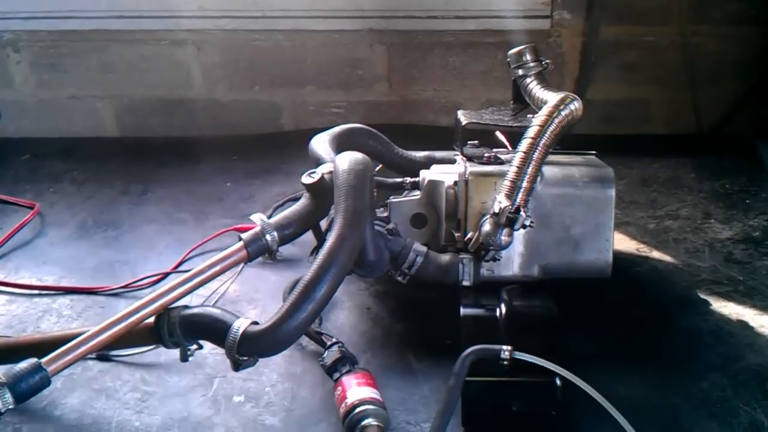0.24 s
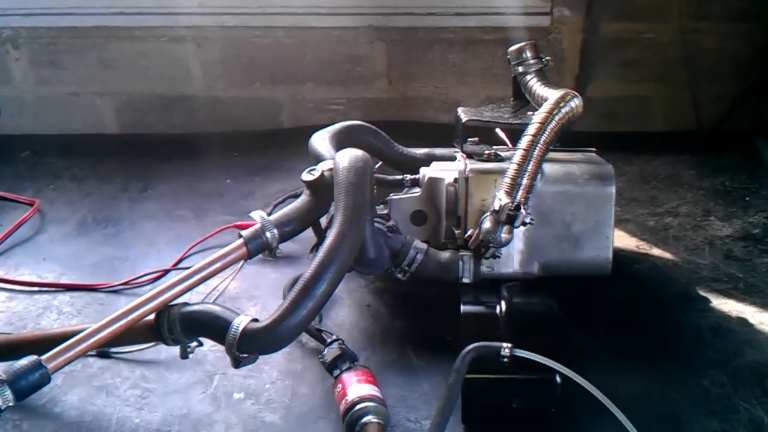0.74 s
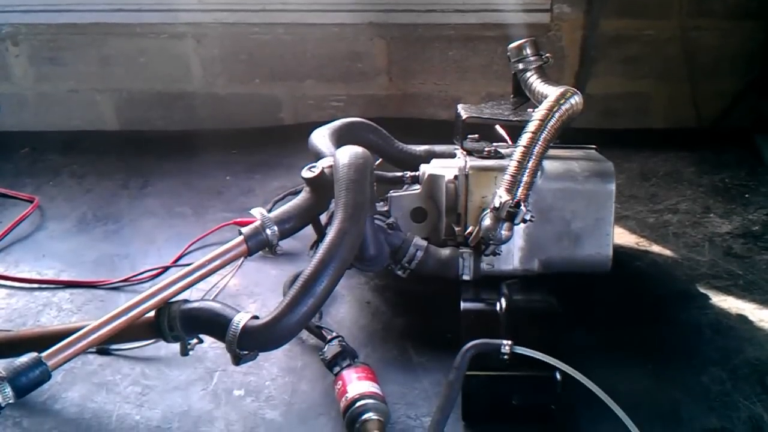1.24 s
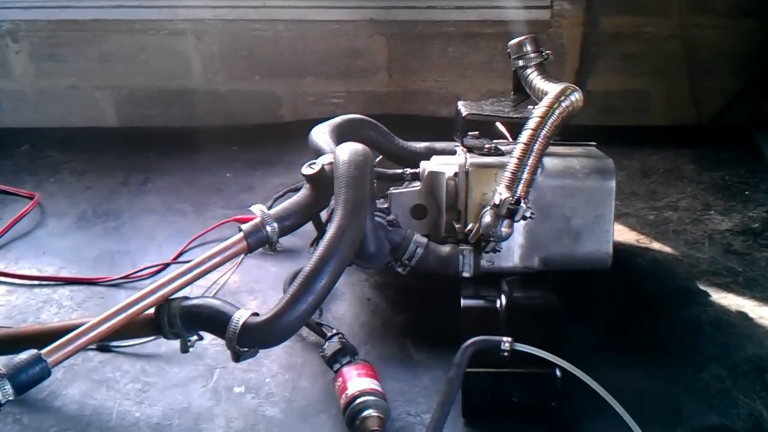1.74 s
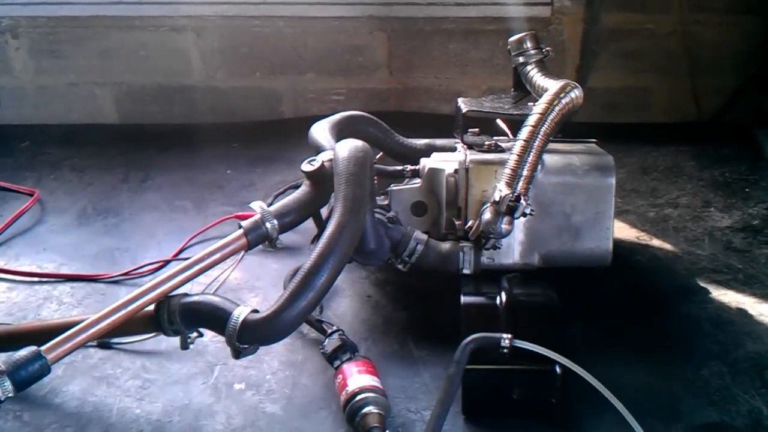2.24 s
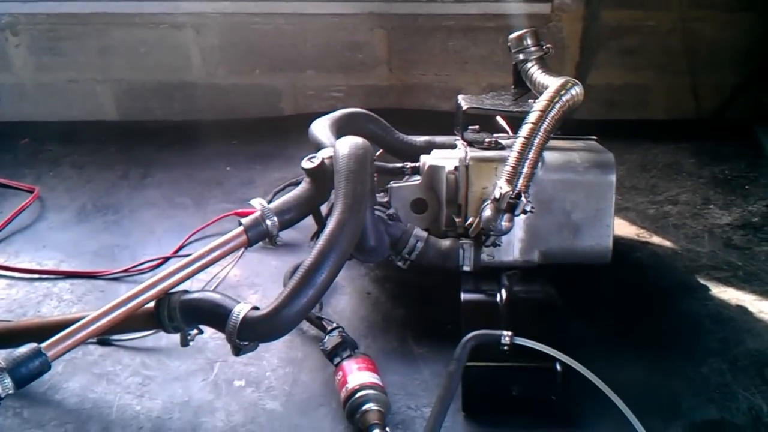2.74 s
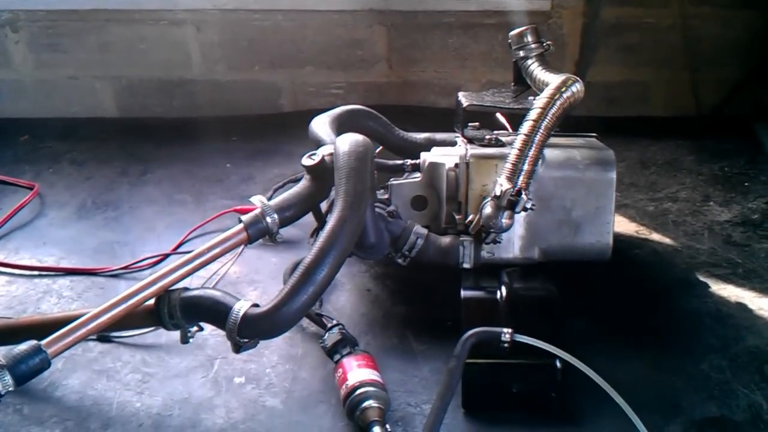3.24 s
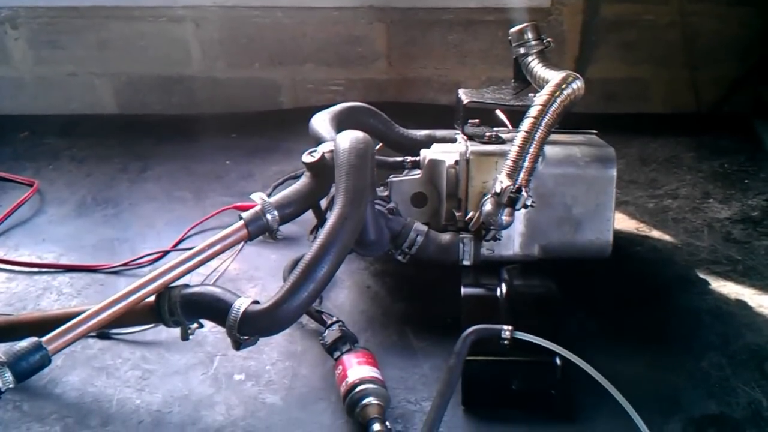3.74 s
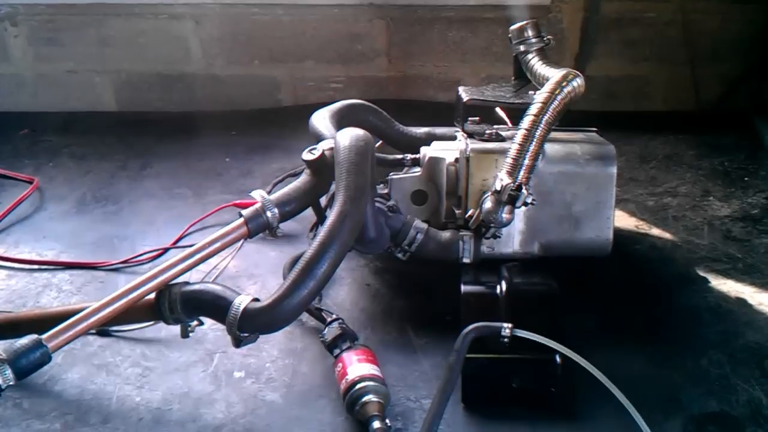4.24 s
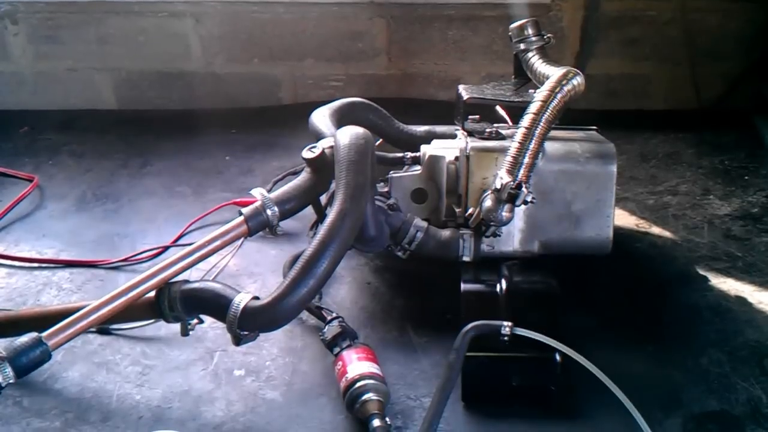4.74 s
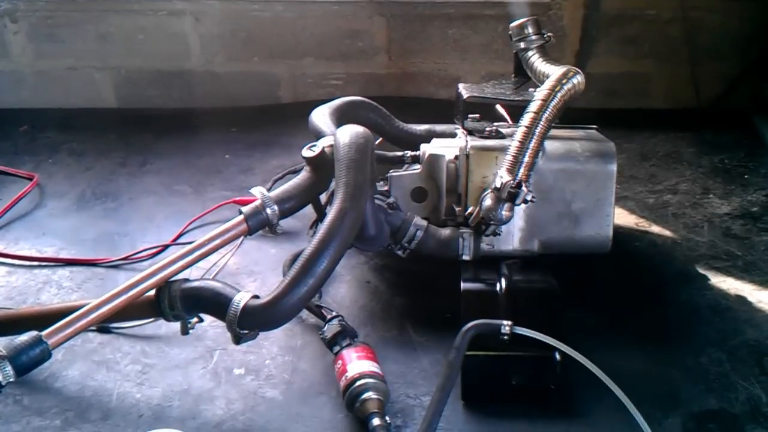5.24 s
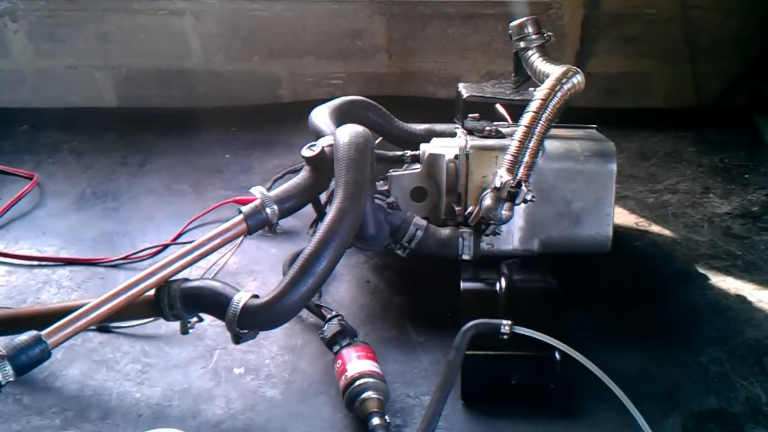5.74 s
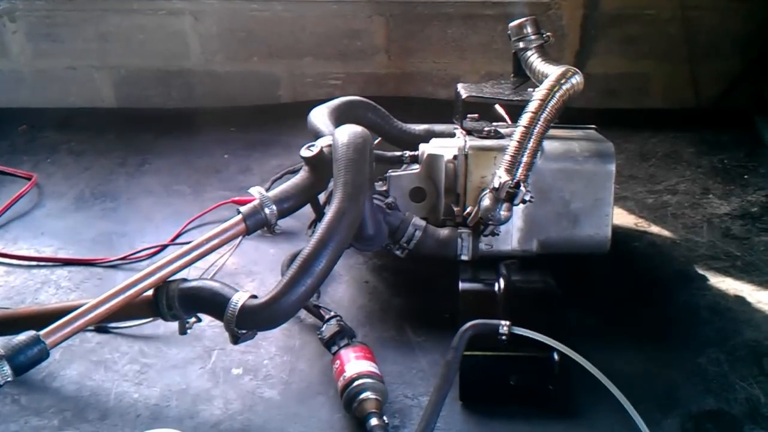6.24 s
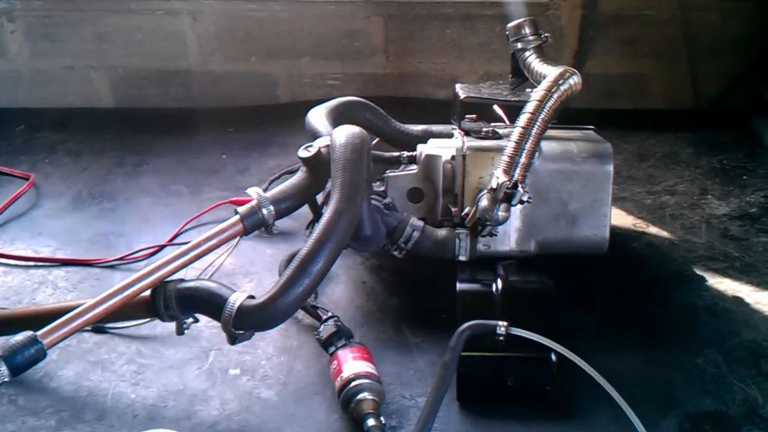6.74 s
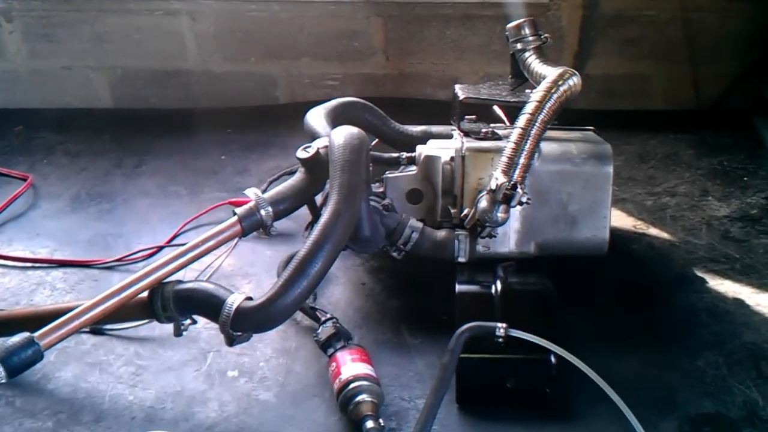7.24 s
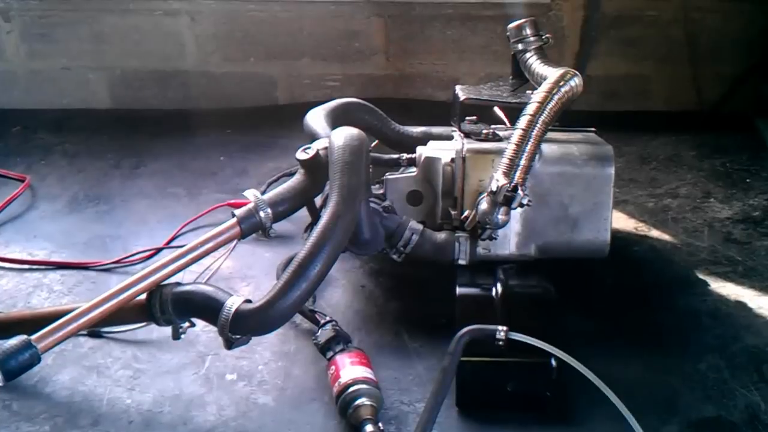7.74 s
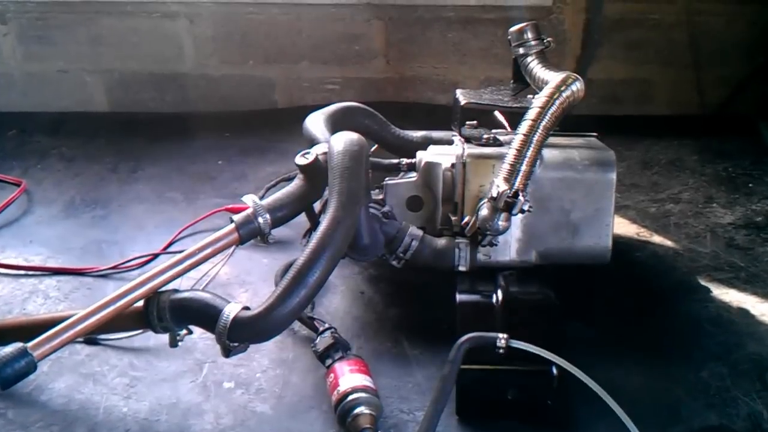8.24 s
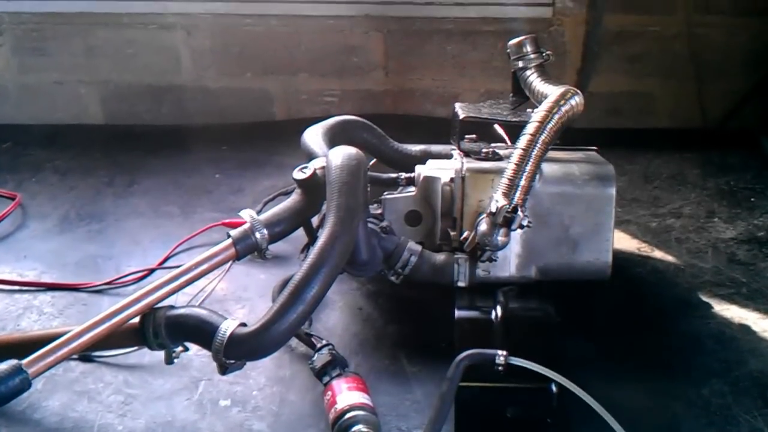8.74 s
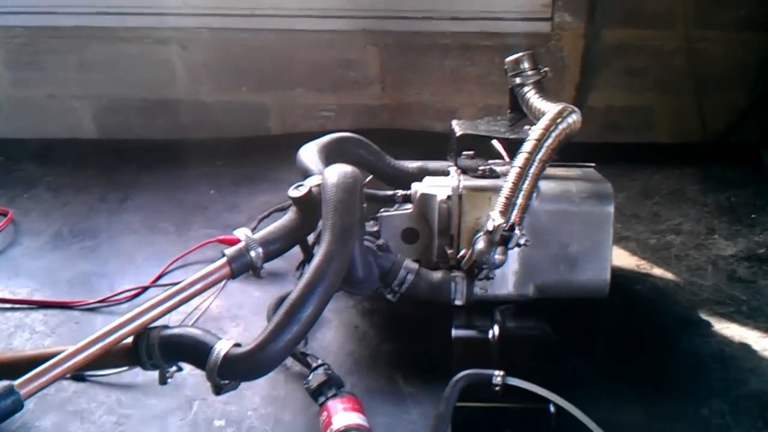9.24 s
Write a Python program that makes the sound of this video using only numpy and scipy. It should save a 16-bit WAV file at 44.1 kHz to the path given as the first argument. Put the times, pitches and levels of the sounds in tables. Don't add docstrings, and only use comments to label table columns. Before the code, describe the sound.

Hand-held microphone near a running heater in a bare-walled garage: a piercing steady motor whine, turbulent air and a rough brush rasp, with fan tones stepping upward. Sharp bright pump clacks fall evenly, with a short room tail. Tiny ticks run ten per second. In the second half the young flame thuds and flutters quietly in the exhaust.

```python
import sys
import numpy as np
from scipy import signal
from scipy.fft import rfft, irfft
from scipy.io import wavfile
from scipy.ndimage import uniform_filter1d, map_coordinates

SR = 44100
rng = np.random.default_rng(int(sys.argv[2]) if len(sys.argv) > 2 else 0)


def convert_level_to_amplitude(level_db):
    exponent = np.asarray(level_db, float) / 20
    return 10 ** exponent


def master_out(mix):
    frames = np.transpose(np.atleast_2d(mix))
    ceiling = np.clip(frames, -1, 1)
    pcm = np.round(ceiling * 32767).astype(np.int16)
    wavfile.write(sys.argv[1], SR, pcm)


N = 418950
CHOPPER_HZ = 1964.47


def set_rms(x, db):
    return x * convert_level_to_amplitude(db) / np.sqrt(np.mean(x ** 2))


def columns(table):
    s, *rest = np.transpose(table)
    return [np.interp(np.arange(N) / SR, s, c) for c in rest]


def arc(dbs):
    return np.interp(np.arange(N), np.linspace(0, N, len(dbs)), dbs)


def walk(rate, count):
    steps = rng.standard_normal((count, 400))
    return [1.03 * np.interp(np.arange(N) / SR * rate, np.arange(steps.shape[1]), s) for s in steps]


def tone(turns, db):
    return np.sqrt(2) * convert_level_to_amplitude(db) * np.sin(2 * np.pi * (turns + rng.random()))


def band(x, lo_hz, hi_hz):
    return signal.sosfilt(signal.butter(2, [lo_hz, hi_hz], "band", fs=SR, output="sos"), x)


def chopper():
    # (time [s], level [dB])
    whine = [(0, -36.5), (2.6, -36.5), (3.3, -38), (4.5, -36.5), (6.2, -37), (6.95, -35.5), (7.5, -36),
             (8.45, -36), (9.4, -33)]
    # (multiple, level at start [dB], after a third [dB], after two thirds [dB], at end [dB])
    multiples = [(2, -72, -62, -67.5, -65), (3, -57.5, -65, -68, -73), (4, -59, -62.5, -61, -56.5),
                 (5, -67, -66, -66, -65), (6, -90, -90, -90, -90), (8, -84, -84, -84, -84)]
    wander_db, wander_per_s = 1.8, 1.8
    turns = CHOPPER_HZ * np.arange(N) / SR
    drifts = walk(wander_per_s, count=len(multiples))
    out = tone(turns, columns(whine)[0])
    for (k, *db), drift in zip(multiples, drifts):
        out = out + tone(k * turns, arc(db) + wander_db * drift)
    return out


def shaft_rate():
    # (time [s], rise of blade rate [Hz])
    speed_steps = [
        (.059, 15.35),
        (1.21, 14.92),
        (2.479, 14.15),
        (4.128, 13.87),
        (5.579, 28.07),
        (6.858, 11.88),
        (8.161, 15.57),
    ]
    start_blade_hz, spin_up_s, blades = 995.49, .471, 19
    t = np.arange(N) / SR
    blade_hz = start_blade_hz
    for s, hz in speed_steps:
        blade_hz = blade_hz + hz * (1 - np.exp(-np.maximum(t - s, 0) / spin_up_s))
    return blade_hz / blades


def colour(x, spectrum):
    # (frequency [Hz], width [Hz], lift [dB])
    casing = [(304.3, 27, 8.5), (422, 101, 7.5), (960, 485, 8), (1283, 140, -3.5), (1627, 44, -13),
              (1890, 600, 6), (2250, 200, 1.5), (2300, 84, -9), (2760, 140, 1), (3160, 210, -2),
              (3450, 93, -3.5), (3896, 230, 8.5), (3905, 72, -11), (4535, 100, 8), (5456, 44, 12),
              (5800, 190, 1.5), (6920, 260, 8), (7400, 260, 3), (7490, 190, 4.5), (7930, 58, 4.5),
              (8016, 220, 6.5), (9300, 110, 0.5), (8775, 87, 9), (9200, 230, 4.5), (9700, 110, -6.5),
              (10600, 720, -4.5)]
    hz = np.arange(1, N // 2 + 2) * SR / N
    spectrum_hz, spectrum_db = np.transpose(spectrum)
    db = np.interp(np.log(hz), np.log(spectrum_hz), spectrum_db)
    db = db + sum(lift_db / (1 + (2 * (hz - f) / width) ** 2) for f, width, lift_db in casing)
    return irfft(rfft(x) * convert_level_to_amplitude(db), N)


def shaft_tones(rate, shaft):
    strong_orders = (19, 38, 24, 43)
    # (frequency [Hz], level [dB])
    blade = [(995.5, -56.1), (1017.8, -54.2), (1032.9, -48.1), (1042.6, -51.0), (1049.9, -47.6),
             (1084.5, -48.8), (1087.7, -51.3), (1108.2, -55.5)]
    twice_blade = [(1991.0, -61.3), (2008.2, -69.2), (2021.4, -56.5), (2065.8, -45.8), (2152.4, -47.3),
                   (2172.5, -51.8), (2196.4, -49.0), (2216.4, -51.8)]
    blade_plus_commutator = [(1257.5, -68.9), (1268.3, -72.3), (1289.1, -60.4), (1304.7, -62.6), (1335.0, -56.7),
                             (1353.1, -68.9), (1375.4, -57.5), (1399.9, -57.6)]
    twice_blade_plus_commutator = [(2253.0, -71.0), (2316.4, -75.5), (2318.2, -70.5), (2359.6, -61.2), (2374.1, -64.0),
                                   (2402.7, -56.8), (2458.3, -65.6), (2508.1, -65.7)]
    weak_orders = (5, 14, 16, 25, 31, 32, 33, 36, 40, 44, 46, 48, 52, 63)
    # (level at start [dB], in the middle [dB], at end [dB])
    weak_db = [(-68.5, -69.5, -68.5), (-69, -69, -60), (-68.5, -63.5, -93), (-67, -68, -70),
               (-83, -65, -57.5), (-79, -58, -57), (-92, -68.5, -58), (-83, -65, -53.5), (-58.5, -83, -79),
               (-64.5, -61, -72), (-93, -69.5, -66), (-60, -70, -71), (-67, -66.5, -67), (-68, -71, -72)]
    out = 0
    for k, path in zip(strong_orders, (blade, twice_blade, blade_plus_commutator, twice_blade_plus_commutator)):
        out = out + tone(k * shaft, np.interp(k * rate, *np.transpose(path)))
    for k, db, drift in zip(weak_orders, weak_db, walk(1.35, count=len(weak_db))):
        out = out + tone(k * shaft, arc(db) + 0.71 * drift)
    return out


def brush_rasp(shaft):
    # (frequency [Hz], density [dB per Hz])
    rasp_spectrum = [(600, -58), (1300, -17.5), (1900, -16), (2600, -18.5), (3600, -18.5), (4600, -24),
                     (5600, -16), (6300, -14), (7000, -8.5), (8100, -5.5), (8700, -16.5), (10000, -15.5),
                     (10700, -18), (11300, -61)]
    track = uniform_filter1d(rng.standard_normal((120, 1024)), size=3, axis=0)
    place = shaft % 1 * (track.shape[1] - 1)
    rasp = map_coordinates(track, [shaft / 12., place], order=1)
    rasp = rasp * (1 + 0.23 * np.sin(2 * np.pi * shaft))
    return set_rms(colour(rasp, rasp_spectrum), -44.5)


def air_stream():
    # (frequency [Hz], density [dB per Hz])
    air_spectrum = [(20, -4), (45, -6.5), (250, -2), (600, -4.5), (1000, -4), (1500, -3), (1900, -1),
                    (2400, -3), (4500, -12), (6400, -5), (7600, -0.5), (8700, -7.5), (11000, -14),
                    (16000, -18.5)]
    air = rng.standard_normal(N) * convert_level_to_amplitude(0.43 * walk(7.6, count=1)[0])
    return set_rms(colour(air, air_spectrum), -45.5)


def blower():
    # (time [s], air level [dB], rasp level [dB])
    flow = [(0, -1.5, -1), (1.5, -1.5, 1.5), (3, -2.5, 1.5), (4.5, -1.5, 0), (6, -1.5, 1), (7.5, -1.5, 0.5),
            (8.5, -1, 1), (9.5, -0.5, 1.5)]
    rate = shaft_rate()
    shaft = np.cumsum(rate) / SR
    air_db, rasp_db = columns(flow)
    return shaft_tones(rate, shaft) + convert_level_to_amplitude(rasp_db) * brush_rasp(shaft) + convert_level_to_amplitude(air_db) * air_stream()


def water_pump():
    # (frequency [Hz], level [dB])
    hum = [(199.5, -65.5), (399.0, -54)]
    t = np.arange(N) / SR
    return sum(tone(f * t, db + 0.82 * d) for (f, db), d in zip(hum, walk(6., count=len(hum))))


def flame():
    # (frequency [Hz], width [Hz])
    exhaust = [(77, 21), (142, 21)]
    # (time [s], peak level [dB], length [s])
    low_puffs = [(1.25, -59, 0.05), (2.56, -61.4, 0.03), (3.67, -65, 0.04), (4.66, -62.0, 0.04),
                 (5.4, -54, 0.03), (5.47, -49, 0.03), (5.7, -63, 0.04), (5.94, -61.1, 0.03),
                 (6.128, -57, 0.064), (6.31, -55, 0.03), (6.4, -56, 0.03), (6.927, -55.8, 0.06),
                 (7.247, -47.5, 0.026), (7.37, -57, 0.05), (7.583, -52, 0.033), (7.71, -56, 0.03),
                 (7.847, -53.2, 0.03), (7.93, -50.2, 0.05), (8.01, -53.0, 0.03), (8.08, -58.5, 0.03),
                 (8.13, -59, 0.03), (8.223, -49, 0.04), (8.335, -49, 0.04), (8.51, -53.2, 0.04),
                 (8.6, -58.0, 0.04), (8.83, -47, 0.04), (9.04, -58.0, 0.03), (9.18, -56.9, 0.03),
                 (9.29, -55.0, 0.08), (9.46, -54, 0.04)]
    # (time [s], peak level [dB], length [s])
    overtone_puffs = [(0.23, -60, 0.09), (1.337, -54, 0.046), (1.48, -61, 0.05), (4.5, -56, 0.08),
                      (4.6, -61.6, 0.03), (4.74, -59, 0.06), (5.39, -66, 0.05), (6.08, -59.1, 0.04),
                      (6.14, -55, 0.04), (6.29, -62.0, 0.03), (8.46, -61.1, 0.03), (8.55, -61.0, 0.05),
                      (8.96, -57, 0.047), (9.27, -59.7, 0.03)]
    simmer_db, growth_db_per_s = (-69.5, -76.5), (1.3, 1.6)
    catch_s, flicker_db = 4, 1.5
    out, t = 0, np.arange(N) / SR
    modes = zip((low_puffs, overtone_puffs), simmer_db, growth_db_per_s, walk(13.0, count=2), exhaust)
    for puffs, start_db, growth, flicker, (hz, width_hz) in modes:
        simmer = start_db + growth * np.maximum(t - catch_s, 0) + flicker_db * flicker
        power = convert_level_to_amplitude(2 * simmer)
        for s, db, length in puffs:
            power = power + convert_level_to_amplitude(2 * db - 2.5) * np.exp(-2.6 * ((t - s) / length) ** 2)
        noise = rng.standard_normal(N)
        swing = set_rms(band(noise, hz - width_hz / 2, hz + width_hz / 2), 0)
        even = swing / (0.2 + np.abs(signal.hilbert(swing))) ** 0.78
        out = out + np.sqrt(power) * set_rms(even, 0)
    return out


def glow_ticks():
    # (delay [s], level [dB])
    contacts = [
        (.0004, 0),
        (.0017, -4),
        (.0031, -3.5),
        (.0043, -4),
        (.0055, -4.5),
        (.0085, -5),
    ]
    # (time [s], level [dB])
    loudness = [(0, -49), (2, -46), (9.5, -45)]
    first_s, period_s = .0208, .099422
    beat = .9
    starts = np.arange(first_s, N / SR - .02, period_s)
    strength = np.sqrt(np.clip(1 - beat * np.cos(2 * np.pi * CHOPPER_HZ * starts), 0, 2) / 2)
    chance = rng.standard_normal((len(starts), len(contacts), 2))
    clicks = np.zeros(N)
    for k, (delay, db) in enumerate(contacts):
        times = starts + delay + 6e-5 * chance[:, k, 0]
        clicks[(times * SR).astype(int)] = strength * convert_level_to_amplitude(db + 1.5 * chance[:, k, 1])
    return convert_level_to_amplitude(columns(loudness)[0] + 26) * band(clicks, 4250, 5500)


def at_strokes(blows):
    # (time [s], peak level [dB])
    strokes = [
        (1.0982, -12),
        (2.322, -13),
        (3.5456, -12.5),
        (4.7673, -11.5),
        (5.9905, -12),
        (7.214, -13),
        (8.437, -12.5),
    ]
    clicks = np.zeros(N)
    for s, db in strokes:
        for delay, blow_db in blows:
            clicks[int((s + delay) * SR)] += convert_level_to_amplitude(db + blow_db)
    return clicks


def decay(x, seconds):
    return signal.lfilter([1], [1, -np.exp(-1 / (seconds * SR))], x)


def ring_of(modes):
    spread_s = .0017
    hz = np.arange(2049) * SR / 4096
    power = 0
    for f, db, t60 in modes:
        offset = (hz - f) * t60 * 2 * np.pi / np.log(1000)
        power = power + convert_level_to_amplitude(2 * db) / (1 + offset ** 2) ** 2
    cepstrum = irfft(np.log(power + 1e-9) / 2)
    cepstrum[1:2048] *= 2
    cepstrum[2049:] = 0
    late = spread_s * np.interp(hz, np.linspace(0, SR / 2, num=60), .2 + .8 * rng.random(60))
    phase = 2 * np.pi * np.cumsum(late) * hz[1]
    response = irfft(np.exp(rfft(cepstrum) - 1j * phase))[:2048]
    return response / np.abs(response).max()


def dosing_pump():
    # (delay [s], level [dB])
    blows = [
        (-.006, -24),
        (.0005, 0),
        (.0017, -8),
        (.0036, -15),
        (.0047, -19),
        (.0657, -21),
    ]
    # (frequency [Hz], level [dB], t60 [s])
    pump_modes = [(1300, -18, .004), (2300, -17, .004), (3400, -18, .004), (4300, -15, .006),
                  (4850, -5, .009), (5200, -7, .01), (5520, -1, .013), (5800, -0.5, .013), (6100, -1, .013),
                  (6700, -6, .01), (7200, -6, .01), (7450, -4, .011), (7850, -7, .009), (8300, -10, .008),
                  (8750, -6, .012), (9300, -8, .01), (9600, -6, .01), (9850, -2, .012), (10450, -14, .01),
                  (11000, -20, .008), (11800, -18, .008), (12500, -23, .005), (14000, -29, .002),
                  (15500, -32, .002)]
    chatter_db, chatter_s = -32, .006
    push = at_strokes(blows)
    chatter = decay(push, chatter_s) * rng.standard_normal(N)
    struck = push + convert_level_to_amplitude(chatter_db) * chatter
    return convert_level_to_amplitude(-3.5) * signal.fftconvolve(struck, ring_of(pump_modes))[:N]


def pump_cracks():
    # (delay [s], level [dB])
    chips = [
        (-.0052, -43),
        (.0662, -48),
    ]
    crack_s, crack_db, chip_s = .0011, -2.5, .0012
    crack = band(at_strokes([(crack_s, crack_db)]), 700, 4400)
    hiss = set_rms(band(rng.standard_normal(N), 10500, 15500), 0)
    return crack + decay(at_strokes(chips), chip_s) * hiss


def room(x):
    t60_s, tail_db = .17, -15.5
    t = np.arange(SR // 4) / SR
    tail = rng.standard_normal(len(t)) * np.exp(-np.log(1000) * t / t60_s) * (t > .003)
    return x + convert_level_to_amplitude(tail_db) * signal.fftconvolve(x, tail / np.sqrt(np.sum(tail ** 2)))[:N]


def scuff():
    time_s, length_s, rub_db = 6.795, .016, -51
    t = np.arange(N) / SR
    rub = set_rms(band(rng.standard_normal(N), 2700, 5000), rub_db)
    return np.exp(-((t - time_s) / length_s) ** 2) * rub


def scene():
    steady = chopper() + blower() + water_pump() + flame()
    knocks = room(glow_ticks() + dosing_pump() + pump_cracks())
    return (steady + knocks + scuff())[None]


def band_limit(x):
    return signal.sosfilt(signal.butter(12, 15850, fs=SR, output="sos"), x)


def record(dry):
    mix = signal.sosfilt(signal.ellip(8, .3, 40, 16000, fs=SR, output="sos"), dry)
    return band_limit(mix)


dry = scene()
out = record(dry)
master_out(out)
```